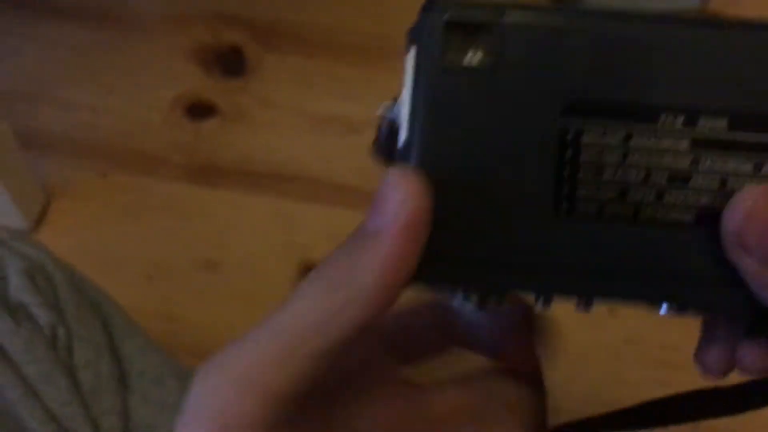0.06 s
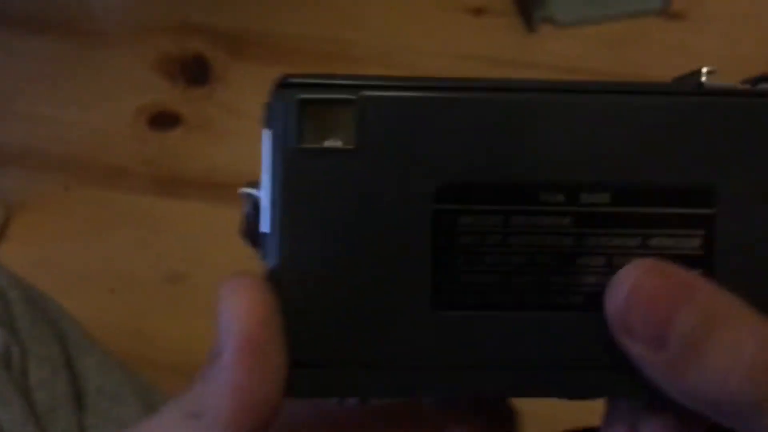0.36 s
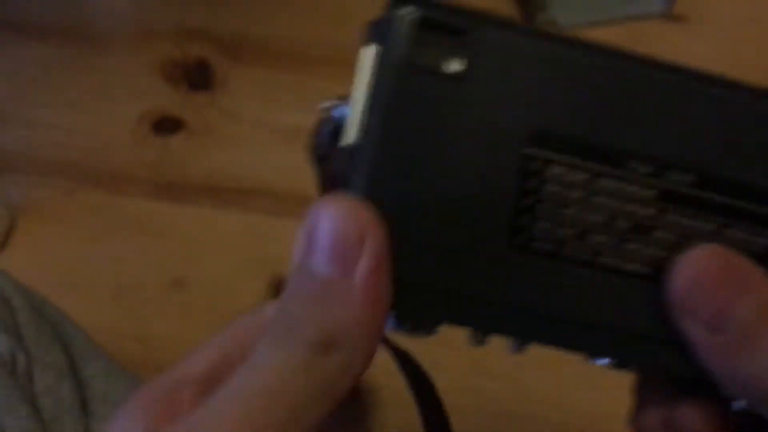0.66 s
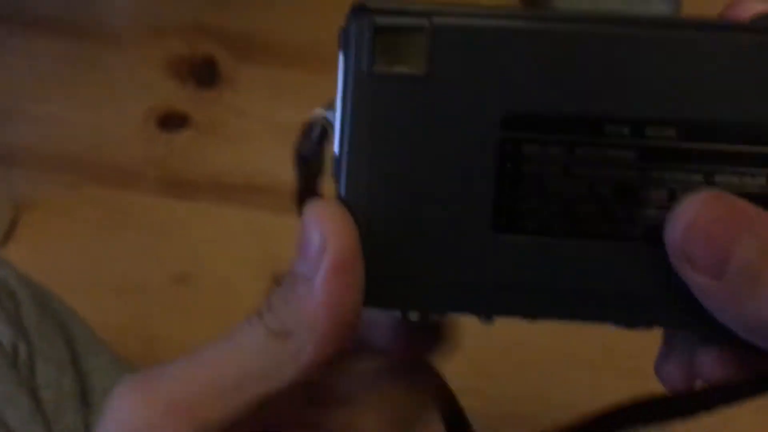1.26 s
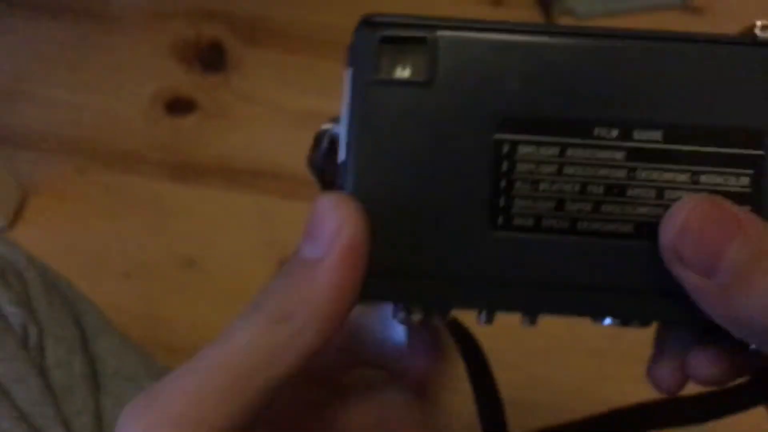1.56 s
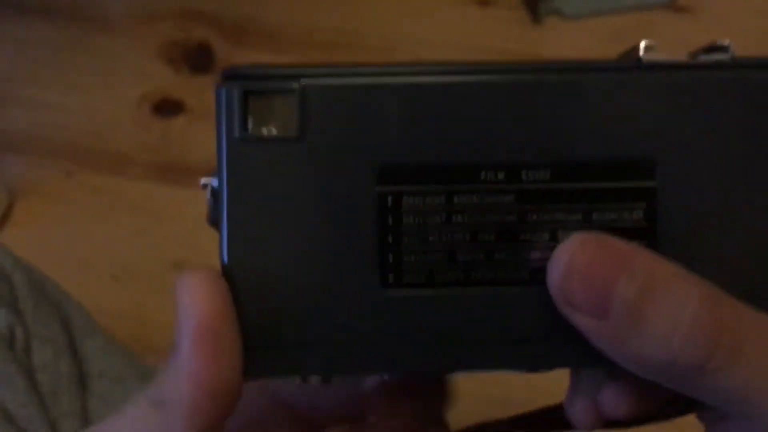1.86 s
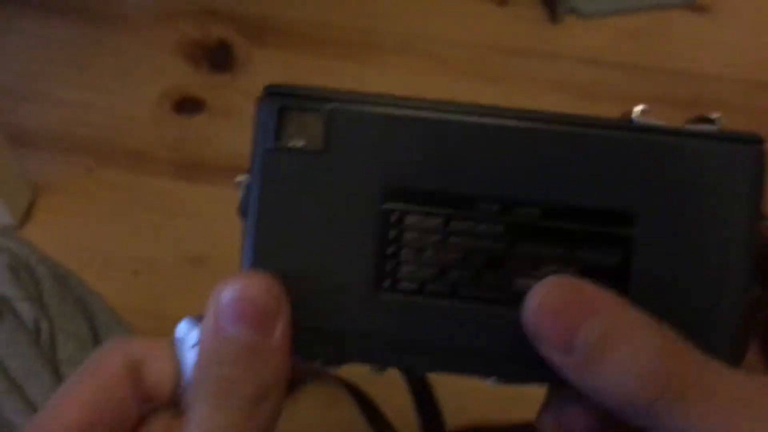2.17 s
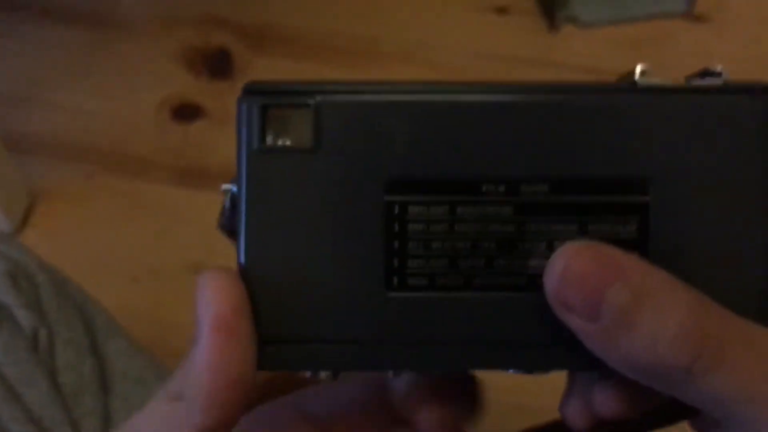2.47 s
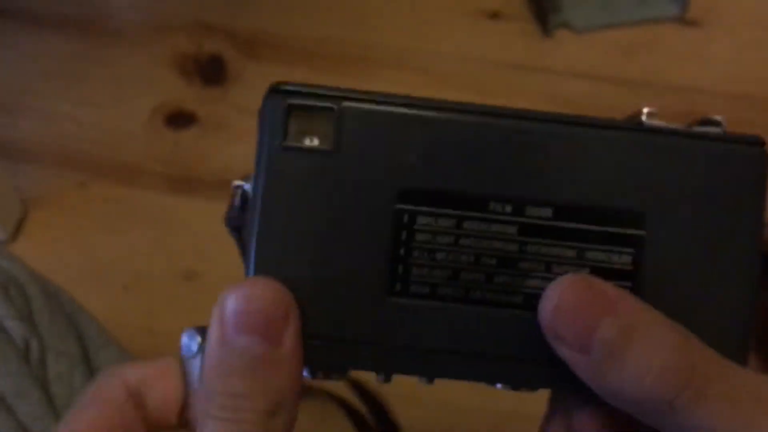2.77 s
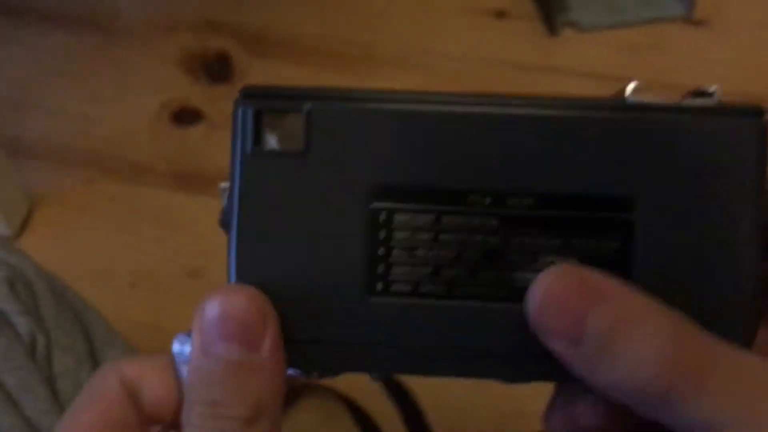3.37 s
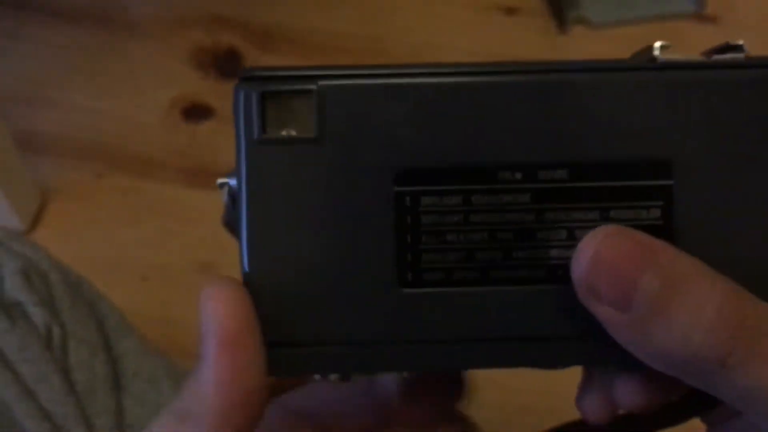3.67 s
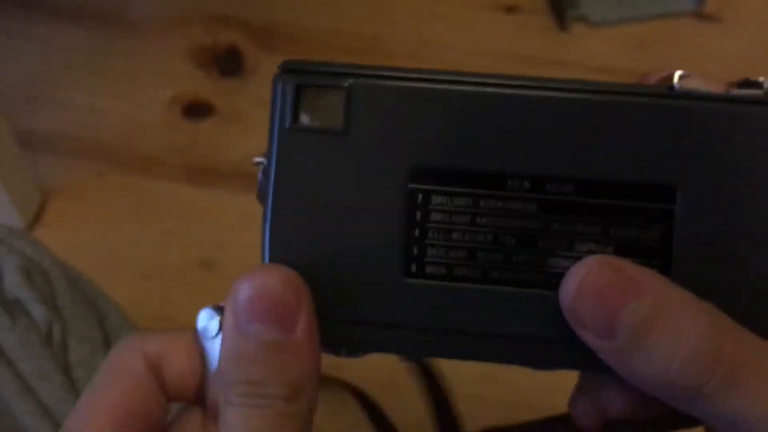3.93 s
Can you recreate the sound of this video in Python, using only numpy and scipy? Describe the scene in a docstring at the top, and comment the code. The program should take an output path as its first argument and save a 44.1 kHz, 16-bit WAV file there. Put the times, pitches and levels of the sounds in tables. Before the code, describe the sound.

Close clicks, sharp snaps and short ratcheting zips from a film camera's winding lever.

```python
"""Clicks, a snap and a short zip, six times over: a film camera wound by hand, close by in a quiet room.
Each push of the lever makes the pawl (a small catch) click, and ends in a snap that rings the case.
On the way back the pawl zips over the teeth of a ratchet wheel until the lever knocks on its stop.
Each click is a tiny burst of noise shaped by a part's resonances, the pitches at which it likes to ring.
A fade time (t60) is how long a sound takes to drop by 60 dB."""
import sys
import numpy as np
from scipy import signal
from scipy.fft import rfft, irfft, next_fast_len
from scipy.io import wavfile

SR = 44100
rng = np.random.default_rng(int(sys.argv[2]) if len(sys.argv) > 2 else 0)


def generate_wav(sig):
    """Save sig (samples, or channels by samples) to the path in sys.argv[1] as 16-bit PCM at SR."""
    pcm = np.round(np.clip(np.atleast_2d(sig).T, -1, 1) * 32767).astype(np.int16)
    wavfile.write(sys.argv[1], SR, pcm)


N = 176400
T = np.arange(4096) / SR  # time within one click [s]
HZ = np.fft.rfftfreq(len(T), 1 / SR)
BANDS = [signal.butter(3, edges_hz, 'bandpass', fs=SR, output='sos')
         for edges_hz in [(600, 2400), (2400, 8000), (8000, 16500)]]  # bass, middle, treble

# Levels in all tables are relative; bass and treble count up or down from the level in their row.
# the snap that ends each push (time [s], level [dB], bass [dB], treble [dB])
SNAPS = [(0.1902, -18, -8, -2.5), (0.8688, -16, -7.5, -2), (1.7015, -17, -4.5, -1.5),
         (2.3942, -17.5, -6, -3.5), (2.989, -19, -6, -2.5), (3.5814, -18, -4.5, -2.5)]
# the lever landing on its stop (time [s], level [dB], bass [dB], treble [dB])
STOPS = [(0.5767,-25.5,-14.5,-2.5), (1.4332,-27,-7.5,-2.5), (2.1280,-26,-14,-4), (2.7078,-31,-7.5,2.5),
         (3.347,-24.5,-14,-1), (3.9310,-26,-11.5,-3)]


def snaps(crack_boost_db):
    """The mechanism snaps home: the case and springs ring, and the camera jolts in the hands."""
    # resonances of the case (pitch [Hz], width [Hz], level [dB])
    case_peaks = [(904, 17, -18.5), (1169, 75, -3), (1251, 126, -1), (1794, 94, -15.5), (2134, 67, -8),
                  (3240, 305, -1.5), (4100, 400, -8), (5430, 250, -3.5), (6460, 520, -9), (7600, 480, -7.5),
                  (9070, 330, 3.5), (11280, 1140, -2)]
    # the case and its springs ringing on (pitch [Hz], level [dB], fade time [s])
    spring_tones = [(1286, -36, 0.2), (1420, -38, 0.45), (3180, -46, 0.15)]
    # the low thud of the jolt (pitch [Hz], level [dB], fade time [s])
    jolt_tones = [(64.5, -38.5, 0.17), (140, -29.5, 0.034), (235, -9.5, 0.012), (353, -11, 0.023)]
    # a loose spring singing after a blow (time [s], pitch [Hz], level [dB], fade time [s])
    pings = [(0.191, 1445, -54, .9), (0.87, 4980, -54, .7), (1.046, 1981, -54, .2), (1.702, 9745, -58, .45)]
    out = np.zeros(N)
    for at, db, bass, treble in SNAPS:
        contact = firm(chatter(t60=0.013, rattle_db=-29, rattle_t60=0.012), below_hz=3170)
        case = resonances(case_peaks, crack_db=-11.5 + crack_boost_db)
        add(out, at, click(contact, case, db + 1.73, bass, treble))
        add(out, at, amp(db + 1.5) * ring(spring_tones, rise_s=0.0029))
        add(out, at, amp(db) * ring(jolt_tones, rise_s=0.0016))
    for at, *tone in pings:
        add(out, at, ring([tone], rise_s=0.002))
    return out


def pawl_clicks(crack_boost_db):
    """The pawl clicks hard over its notches as the lever is pushed."""
    # the clicks (time [s], level [dB], bass [dB], treble [dB], fade time [s])
    clicks = [(0.0636,-28,-6.5,0,0.013), (0.1019,-21,-12,-6.5,0.0044), (0.1422,-23,-16.5,-2.5,0.006),
              (0.8177,-31.5,-11,-9.5,0.0098), (0.8419,-21.5,-14,-1,0.0068), (1.606,-26.5,-7,-3.5,0.0043),
              (1.6216,-26,-9,-5,0.014), (1.6456,-28,-11,4.5,0.011), (1.6646,-24,-13.5,-6,0.011),
              (1.687,-29,-9,5,0.0047), (2.304,-26.5,-10.5,-12,0.012), (2.3218,-21.5,-9,-4,0.0096),
              (2.3545,-25.5,-5.5,1.5,0.009), (2.3911,-21,-14,0,0.02), (2.9095,-35.5,-2.5,-5,0.0063),
              (2.9279,-28.5,-5,-0.5,0.0084), (2.942,-33.5,-4.5,-3,0.0091), (2.9599,-32,-3,-3,0.0067),
              (2.9633,-22.5,-10.5,-2,0.0051), (2.9656,-25.5,-13,1.5,0.026), (3.499,-26,-6.5,-1.5,0.0039),
              (3.5134,-29,-9,-2,0.006), (3.5315,-29,-10,-2,0.0042), (3.5469,-22.5,-11,-6,0.0065),
              (3.5618,-31.5,-2,5,0.0095), (3.567,-22.5,-19,2.5,0.019)]
    # resonances of the pawl (pitch [Hz], width [Hz], level [dB])
    pawl_peaks = [(935, 10.7, 4), (1313, 60, 11), (2130, 140, -0.5), (3120, 114, 0.5), (3700, 730, -2),
                  (6080, 740, 1.5), (7000, 1200, -4.5), (8740, 500, -3.5), (11700, 680, -10),
                  (12500, 500, -9.5)]
    out = np.zeros(N)
    for at, db, bass, treble, t60 in clicks:
        contact = firm(chatter(t60, rattle_db=-34.5, rattle_t60=0.032, rise_s=0.00068), below_hz=1270)
        pawl = resonances(pawl_peaks, crack_db=-18 + crack_boost_db)
        add(out, at, click(contact, pawl, db + 0.5, bass, treble))
    return out


def ratchet(crack_boost_db):
    """On each return the pawl drops off tooth after tooth and squeaks up the next."""
    # how far the wheel has turned, one list for each return (time [s], teeth passed [count])
    travels = [
        [(.5006, 0), (.5127, 1), (.5235, 2), (.5321, 3), (.5478, 5), (.5623, 7)],
        [(1.2601, 0), (1.2807, 1), (1.2989, 2), (1.3154, 3), (1.3296, 4), (1.3423, 5), (1.3727, 8), (1.381, 9),
         (1.4006, 12), (1.4168, 14)],
        [(2.0024, 0), (2.0143, 1), (2.0617, 6), (2.0732, 7), (2.0948, 9), (2.1142, 11)],
        [(2.5711, 0), (2.5908, 2), (2.6055, 4), (2.6344, 8), (2.6612, 12), (2.6695, 13), (2.6908, 15),
         (2.6996, 16)],
        [(3.1781, 0), (3.2047, 2), (3.2207, 3), (3.2321, 4), (3.2616, 7), (3.2954, 11), (3.3143, 13)],
        [(3.7819, 0), (3.7914, 1), (3.8134, 3), (3.8434, 6), (3.8617, 8), (3.9154, 13), (3.9234, 14)],
    ]
    # the tooth clicks of each return (level [dB], treble [dB], starting bass [dB])
    tooth_sounds = [(-29.5, 1, -17), (-31, 3.5, -17.5), (-29.5, 0.5, -17), (-31.5, 1.5, -14.5),
                    (-30.5, 2.5, -17.5), (-30, 1.5, -17)]
    # resonances of the ratchet (pitch [Hz], width [Hz], level [dB])
    ratchet_peaks = [(1294, 79, 1.5), (2130, 52, -5), (3150, 250, -5), (3840, 370, -0.5), (4470, 190, 1.5),
                     (5340, 99, 3), (5910, 200, 5), (6300, 300, -8), (6800, 660, -0.5), (9260, 360, 1.5),
                     (11530, 760, -2), (13660, 380, 7), (15900, 500, -5)]
    # extra ones on the first return, where the pawl sits differently (pitch [Hz], width [Hz], level [dB])
    first_peaks = [(5860, 120, 10), (11200, 440, 6), (12200, 400, 8.9)]
    out = np.zeros(N)
    for stroke, (travel, (db, treble, start_bass)) in enumerate(zip(travels, tooth_sounds)):
        moments, passed = np.transpose(travel)
        times = np.interp(np.arange(passed[-1] + 1), passed, moments)
        peaks = ratchet_peaks if stroke else ratchet_peaks + first_peaks
        for at, gap, progress in zip(times, np.gradient(times), np.linspace(0, 1, len(times))):
            level = db - 1.5 * progress + 1.1 * rng.normal()
            bass = start_bass + 4.5 * progress  # the case rings more as the stroke goes on
            drop = chatter(t60=0.0062, rattle_db=-22.5, rattle_t60=0.034, rise_s=0.0011)
            wheel = resonances(peaks, crack_db=-9 + crack_boost_db)
            add(out, at, click(firm(drop, below_hz=1070), wheel, level, bass, treble))
            # part of the way along, the pawl touches the next tooth
            add(out, at + 0.3 * gap, amp(level - 9) * squeak(hz=4176 - 970 * progress))
    return out


def squeak(hz, length_s=0.0069):
    """The pawl slides up a tooth with a brief tone, a little different in pitch and level each time."""
    swell = np.sin(np.pi * np.minimum(T / length_s, 1)) ** 2
    pitch = hz * (1 + 0.04 * rng.normal())
    return swell * np.sin(2 * np.pi * pitch * T) * amp(2.5 * rng.normal())


def lever_knocks(crack_boost_db):
    """The lever knocks loosely, then lands on its stop and sets the return spring ringing."""
    # the loose knocks (time [s], level [dB], bass [dB], treble [dB])
    knocks = [(0.4526,-37,-14,3), (0.463,-34,-16,-1), (0.480,-26.5,-14,-1.5), (0.485,-35,-7.5,-9),
              (0.567,-27.5,-7.5,0), (1.0392,-33.5,-8,1), (1.0459,-26,-9.5,3.5), (1.217,-34,-10,3),
              (1.2256,-27,-13.5,-1.5), (1.4244,-26.5,-13,-7), (1.8141,-33.5,-5.5,1.5), (1.820,-26,-11,-1.5),
              (1.9639,-34.5,-16,2.5), (1.9777,-30.5,-15.5,2), (1.9895,-27.5,-17,-8), (1.9933,-25.5,-12,0),
              (2.1205,-31,-4,1), (2.4254,-32.5,-8,0), (2.431,-26.5,-11.5,-1.5), (2.608,-29.5,-10,-1),
              (3.1305,-32.5,-16,3.5), (3.1379,-26,-12,-4), (3.331,-32.5,-12,-3), (3.3394,-31.5,-13,-8),
              (3.7469,-36,-0.5,-2), (3.759,-38,-13,11.5), (3.7687,-23.5,-15.5,-2)]
    # resonances of the lever (pitch [Hz], width [Hz], level [dB])
    lever_peaks = [(940, 60, -7), (1286, 110, -3.5), (2177, 196, -4), (3290, 170, 0.5), (3930, 1000, -0.5),
                   (5610, 330, 3), (6530, 790, 2.5), (7860, 500, 3), (9390, 760, 4.5), (11630, 930, 9.5),
                   (13700, 450, 2)]
    # tones of the return spring (pitch [Hz], level [dB], fade time [s])
    spring_tones = [(1265, -30.5, 0.27), (4380, -38, 0.2), (6630, -20, 0.23), (7800, -29, 0.22)]
    out = np.zeros(N)
    for at, db, bass, treble in knocks + STOPS:
        contact = chatter(t60=0.0096, rattle_db=-11, rattle_t60=0.046, rise_s=0.00054)
        lever = resonances(lever_peaks, crack_db=-10.5 + crack_boost_db)
        add(out, at, click(firm(contact, below_hz=1820), lever, db + 2, bass, treble))
    for at, db, *_ in STOPS:
        add(out, at, amp(db) * ring(spring_tones, rise_s=0.002))
    return out


def linkage_ticks(crack_boost_db):
    """The linkage, the small parts that pass the motion on, ticks lightly."""
    # the ticks (time [s], level [dB], treble [dB])
    ticks = [(0.0332,-43,-7.5), (0.078,-35.5,-7), (0.0832,-40,-17), (0.1199,-36,-3), (0.1665,-35,-13),
             (0.262,-46.5,1), (0.3079,-39.5,-1), (0.4126,-38.5,-10), (0.471,-40.5,6), (0.792,-47,-3.4),
             (0.8584,-33,-2), (1.002,-46,2.5), (1.0304,-44,-2), (1.2062,-44,3), (1.2133,-42,2),
             (1.4753,-47,4), (1.568,-48,-22), (1.575,-46.5,0), (1.79,-44.5,-2), (1.8057,-41,2),
             (1.9383,-38.5,-6), (2.2733,-44,-6), (2.287,-45,0), (2.296,-40.5,-25), (2.334,-37,-11),
             (2.3725,-35,-5), (2.4477,-38.5,2), (2.5433,-44,-9), (2.552,-37.5,-17), (2.5558,-38,-6),
             (2.8652,-45.5,-4), (2.877,-45.5,-4), (2.9791,-32,-5), (3.1182,-41.5,4.5), (3.469,-44.5,-4)]
    # resonances of the linkage (pitch [Hz], width [Hz], level [dB])
    linkage_peaks = [(1344, 25, -2), (2060, 160, -16), (3290, 400, 0.5), (3920, 870, -5.5),
                     (6060, 4200, -4.5), (9300, 480, -1), (11500, 830, -3)]
    out = np.zeros(N)
    for at, db, treble in ticks:
        contact = chatter(t60=0.0052, rattle_db=-20, rattle_t60=0.073)
        linkage = resonances(linkage_peaks, crack_db=-8.5 + crack_boost_db)
        add(out, at, click(contact, linkage, db + 0.5, bass_db=-5, treble_db=treble))
    return out


def finger_bumps():
    """A finger bumps the camera body with a soft, low thud."""
    # the bumps (time [s], level [dB])
    bumps = [(1.159, -38), (2.21, -52)]
    # tones of the bumped body (pitch [Hz], level [dB], fade time [s])
    thud_tones = [(81, 0.5, 0.13), (144, 3.5, 0.051), (255, 0.5, 0.078)]
    out = np.zeros(N)
    for at, db in bumps:
        add(out, at, amp(db) * ring(thud_tones, rise_s=0.0043))
    return out


def camera(crack_boost_db):
    """All the blows, heard through the case; the boost raises the crack between the resonances."""
    sources = (pawl_clicks, snaps, lever_knocks, linkage_ticks)
    blows = sum(source(crack_boost_db) for source in sources) + finger_bumps() + ratchet(crack_boost_db)
    return filtered(blows, hollow_case)


def hollow_case(hz, note_hz=1200, width_hz=320):
    """The hollow case delays the sound near its own note, without changing its level."""
    resonance = note_hz ** 2 - hz ** 2 + 1j * hz * width_hz
    return np.conj(resonance) / resonance


def chatter(t60, rattle_db, rattle_t60, rise_s=0.0002):
    """Two parts meet: a short burst of tiny collisions, with a weaker rattle."""
    fade = amp(-60 * T / t60) + amp(rattle_db - 60 * T / rattle_t60)
    return rng.standard_normal(len(T)) * fade * (1 - np.exp(-T / rise_s))


def firm(contact, below_hz):
    """For the low resonances the collisions act as one push, so these ring alike every time."""
    low, high = (signal.butter(4, below_hz, kind, fs=SR, output='sos') for kind in ('low', 'high'))
    one_push = (T == 0) * np.linalg.norm(contact)
    return signal.sosfilt(low, one_push) + signal.sosfilt(high, contact)


def resonances(peaks, crack_db):
    """How a part answers a blow at each frequency: ringing peaks over a broad, toneless crack."""
    # how well the ringing passes into the air (frequency [Hz], level [dB])
    into_air = [(300, -6), (520, -8), (780, -7.5), (1050, -1), (1400, -3.5), (1570, -9), (1850, 0.5)]
    # the tone colour of the crack (frequency [Hz], level [dB])
    crack_colour = [(40, -31), (120, -20), (350, -16), (520, -21.5), (800, -20), (1600, -18), (3500, -9.5),
                    (9000, -1), (14000, -4), (16500, -41)]
    power = 0
    for pitch, width, db in peaks:
        # the grip shifts the high pitches and all the levels from blow to blow
        pitch *= 1 + 0.0042 * rng.normal() * (pitch > 2500)
        db += 0.5 * rng.normal()
        power += abs(amp(db) * HZ * width / (pitch ** 2 - HZ ** 2 + 1j * HZ * width)) ** 2
    power *= amp(along(into_air, HZ)) ** 2
    crack = amp(crack_db + along(crack_colour, HZ))
    return after_blow(np.sqrt(power + crack ** 2))


def click(contact, part, db, bass_db, treble_db):
    """A contact rings a part; the blow sets its level, bass and treble."""
    spectrum = rfft(contact) * part
    raw = irfft(spectrum)
    energy = np.array([np.sum(signal.sosfilt(band, raw) ** 2) for band in BANDS])
    raw_db = 10 * np.log10(energy / (0.005 * SR))  # as if each band's energy were spread over 5 ms
    low, mid, high = db + np.array([bass_db, 0, treble_db]) - raw_db
    tone = [(1900, low), (3000, mid), (6800, mid), (9400, high)]  # (frequency [Hz], gain [dB])
    return irfft(spectrum * after_blow(amp(along(tone, HZ))))


def ring(tones, rise_s):
    """A struck part rings on: pure tones that each fade at their own rate."""
    t = np.arange(SR // 2) / SR
    ringing = sum(amp(db + rng.normal() - 60 * t / t60) * np.sin(2 * np.pi * hz * t)
                  for hz, db, t60 in tones)
    return (1 - np.exp(-t / rise_s)) * ringing


def bearing_rub(level_db=-59, push_s=0.145, return_s=0.206):
    """The moving lever rubs in its bearing, and the case hums softly before each snap and stop."""
    # peaks of the hum (pitch [Hz], half-width [Hz], level [dB])
    hum_peaks = [(908, 54, -10), (1310, 30, 2.5)]
    moving = np.zeros(N)
    for ends, length_s in ((SNAPS, push_s), (STOPS, return_s)):
        for end, *_ in ends:
            add(moving, max(end - length_s, 0), signal.windows.tukey(round(length_s * SR), 0.2))
    hum = filtered(rng.standard_normal(N), lambda hz: sum(
        amp(db) / (1 + ((hz - pitch) / width) ** 2) for pitch, width, db in hum_peaks))
    return amp(level_db) * moving * hum / hum.std()


def room_echo(sound, early_db=-8.5, early_t60=0.023, tail_db=-14):
    """The tabletop answers at once and the room fades behind it, a little differently as the camera moves."""
    # how long the room rings (frequency [Hz], fade time [s])
    fade_times = [(200, 0.082), (1300, 0.19), (4000, 0.24), (10000, 0.27), (16000, 0.2)]
    # the tone colour of the echo (frequency [Hz], level [dB])
    echo_colour = [(200, -11), (800, 4), (1200, 6), (1700, 7), (3500, 1.5), (7000, -5.5), (11000, -5),
                   (15000, -11)]
    out, step = np.zeros(N), SR // 4
    for start in range(0, N, step):  # a fresh echo every quarter second
        hz, t, noise = signal.stft(rng.standard_normal(SR // 2), SR, nperseg=256)
        fade = amp(-60 * t / along(fade_times, hz)[:, None])
        _, tail = signal.istft(noise * fade, SR, nperseg=256)
        t = np.arange(len(tail)) / SR
        onset = 1 - np.exp(-(t / 0.0016) ** 2)
        early = rng.standard_normal(len(t)) * amp(-60 * t / early_t60) * onset
        echo = amp(early_db) * early / np.linalg.norm(early)
        echo += amp(tail_db) * onset * tail / np.linalg.norm(tail)
        add(out, start / SR, signal.fftconvolve(sound[start:start + step], echo))
    return filtered(out, lambda hz: amp(along(echo_colour, hz)))


def room_noise(level_db=-58.5):
    """The quiet, steady hush of the room."""
    # the tone colour of the hush (frequency [Hz], level [dB])
    hush_colour = [(20, -13), (35, 3.5), (49, 10.5), (65, 2.5), (250, -1.5), (520, -8), (850, -12),
                   (1290, -6.5), (1520, -13.5), (2110, -8.5), (2690, -15), (3250, -11), (5880, -13),
                   (11600, -17.5), (16000, -28)]
    hush = filtered(rng.standard_normal(N), lambda hz: amp(along(hush_colour, hz)))
    return amp(level_db) * hush / hush.std()


def amp(db):
    """Turn decibels into a number to multiply by."""
    return 10 ** (np.asarray(db) / 20)


def along(points, hz):
    """Read between (frequency [Hz], value) points on a log frequency scale."""
    frequencies, values = np.transpose(points)
    return np.interp(np.log(hz + 1), np.log(frequencies + 1), values)


def add(track, at, sound):
    """Mix a sound into a track at a time in seconds."""
    part = track[round(at * SR):][:len(sound)]
    part += sound[:len(part)]


def filtered(sound, gain):
    """Multiply each frequency of a sound by gain(hz)."""
    size = next_fast_len(len(sound) + SR // 4)
    return irfft(rfft(sound, size) * gain(np.fft.rfftfreq(size, 1 / SR)), size)[:len(sound)]


def after_blow(gain):
    """A filter with this gain that rings only after the blow, never before (minimum phase)."""
    cepstrum = irfft(np.log(gain + 1e-6))  # the log of the gain, laid out in time
    half = len(cepstrum) // 2
    cepstrum[1:half] *= 2
    cepstrum[half + 1:] = 0
    return np.exp(rfft(cepstrum))


def scene():
    """The camera heard directly, the room's answer to its clicks, and the hush behind them."""
    direct = camera(crack_boost_db=0) + bearing_rub()
    # summed over all directions, the crack stands higher among the resonances
    echo = room_echo(camera(crack_boost_db=13.5))
    return (direct + echo + room_noise())[None]


def record(dry):
    """The highest peaks are rounded off and the very top of the treble is cut."""
    ceiling, top_hz = 0.95, 15950
    rounded = dry[0] / (1 + abs(dry[0] / ceiling) ** 6) ** (1 / 6)
    return filtered(rounded, lambda hz: 1 / (1 + (hz / top_hz) ** 120))[None]


dry = scene()
out = record(dry)
generate_wav(out)
```